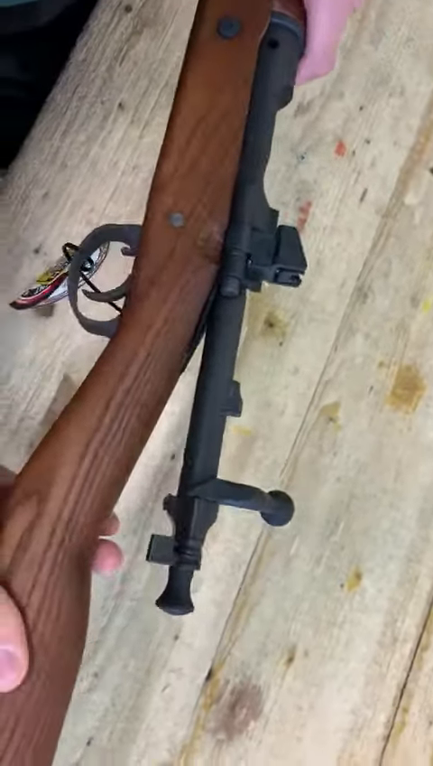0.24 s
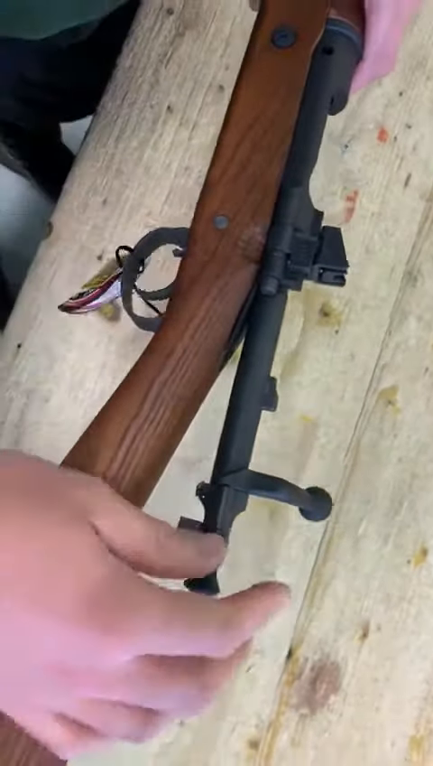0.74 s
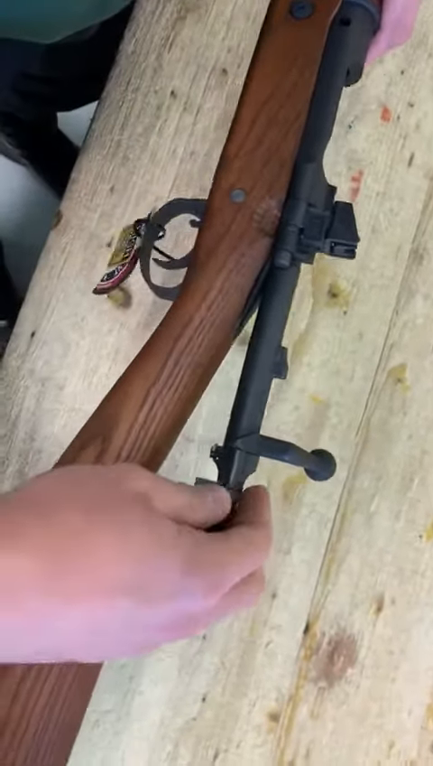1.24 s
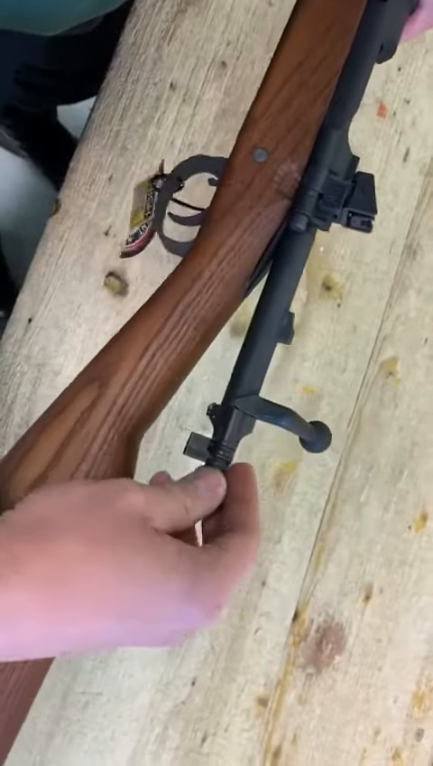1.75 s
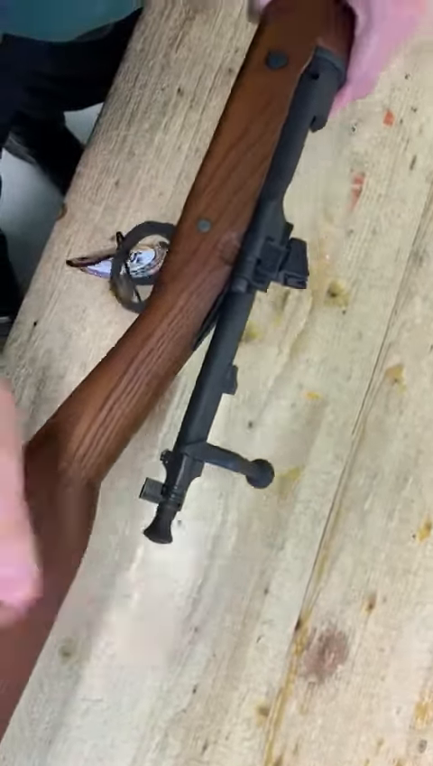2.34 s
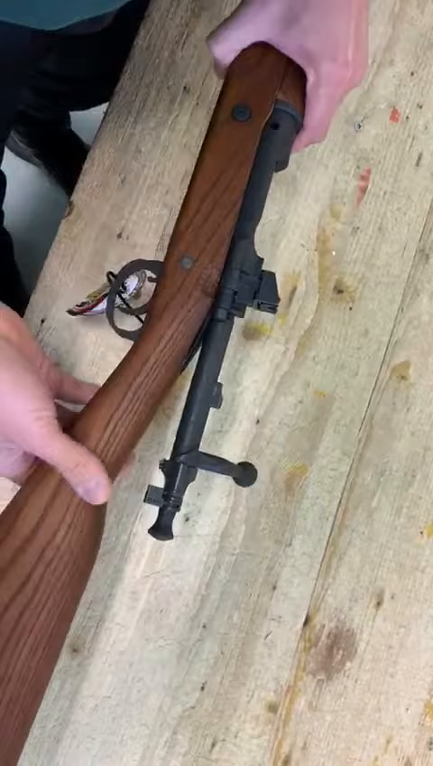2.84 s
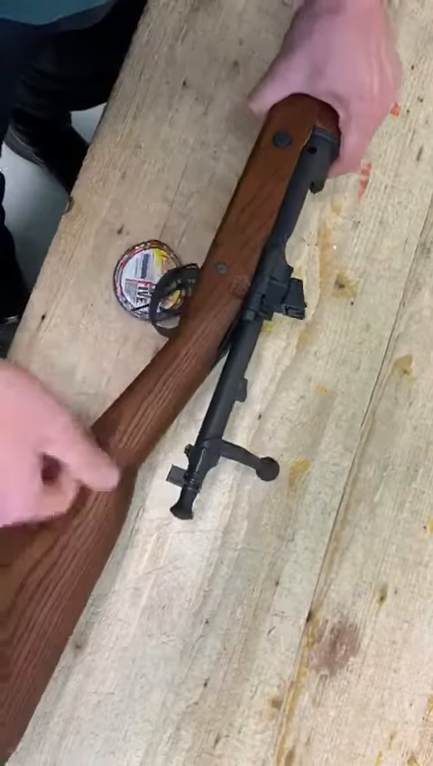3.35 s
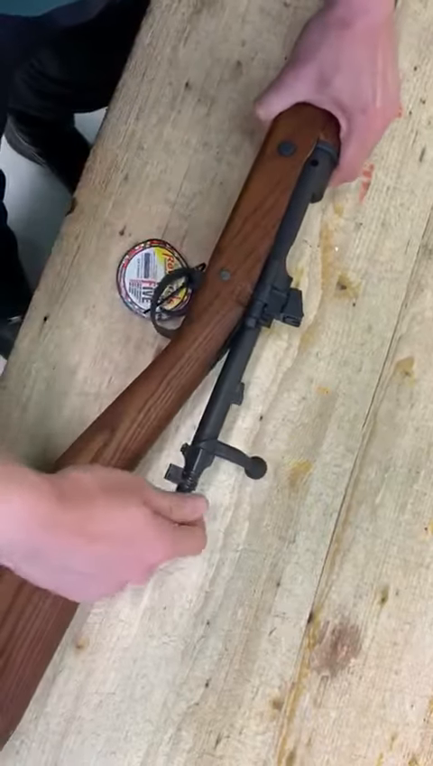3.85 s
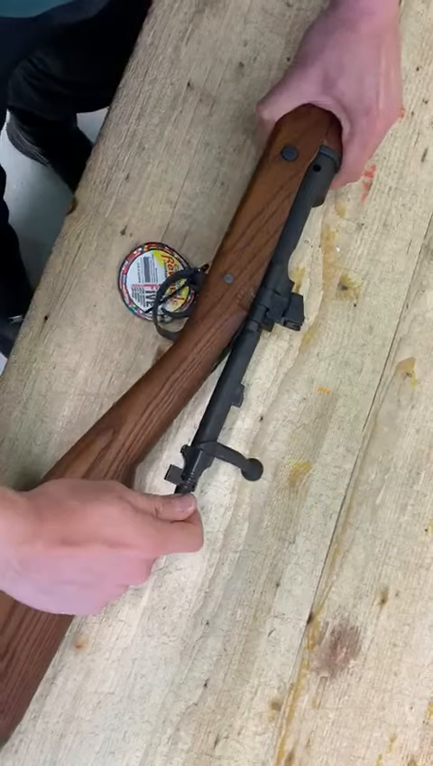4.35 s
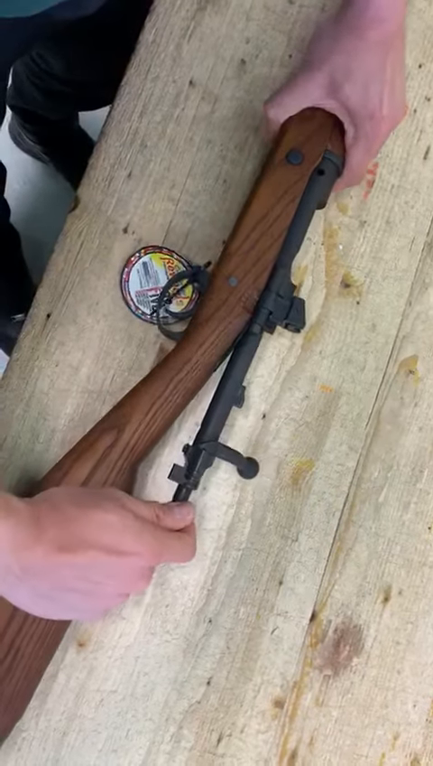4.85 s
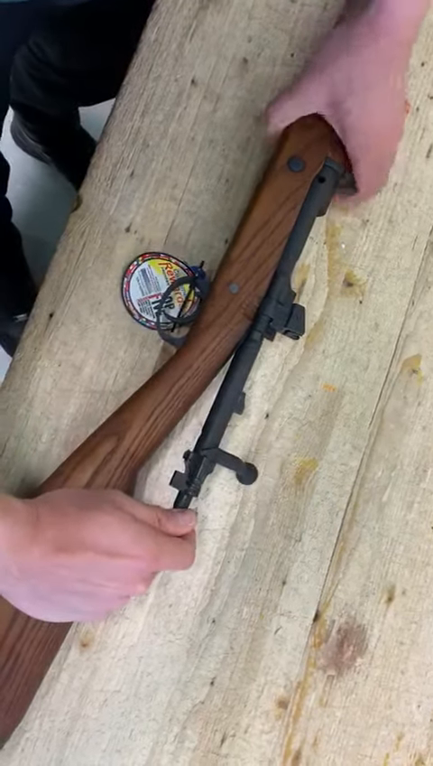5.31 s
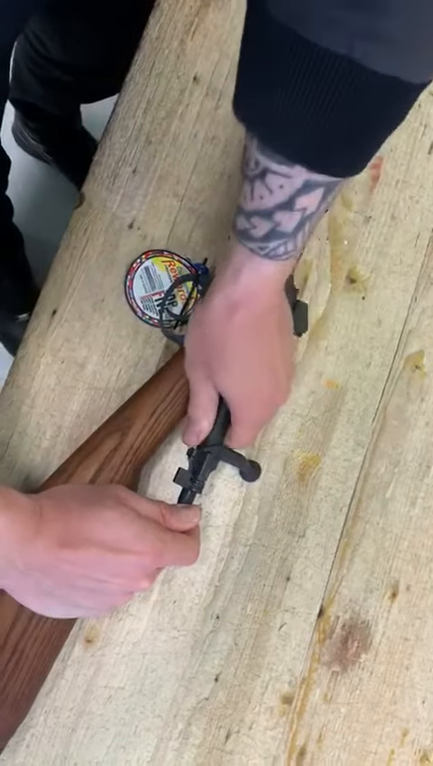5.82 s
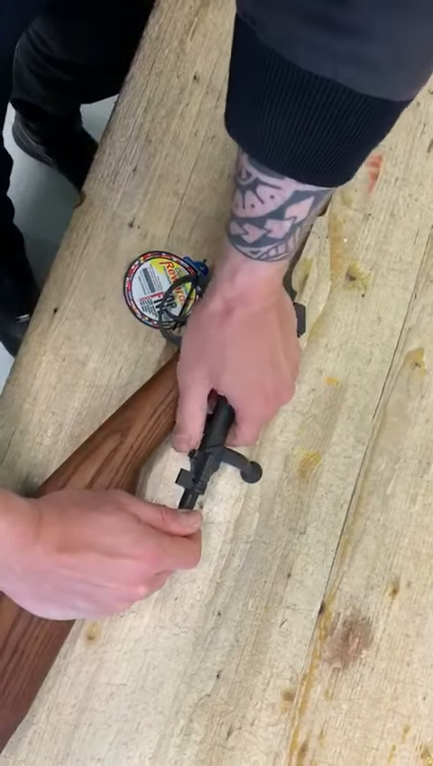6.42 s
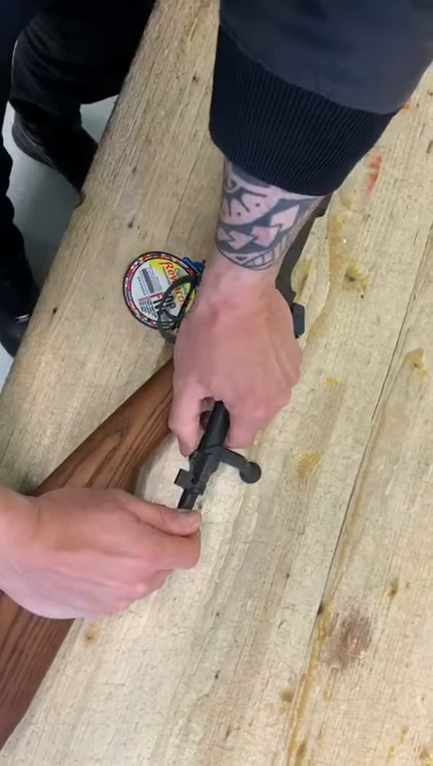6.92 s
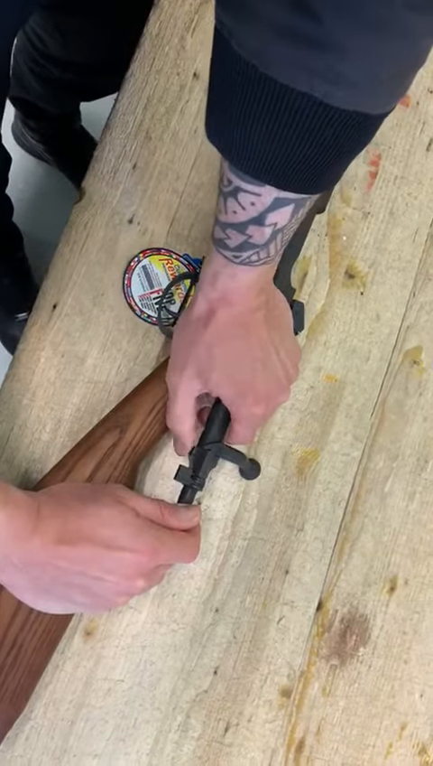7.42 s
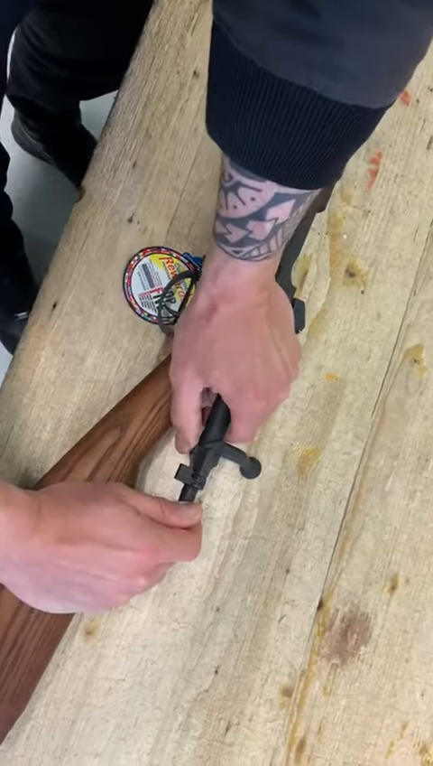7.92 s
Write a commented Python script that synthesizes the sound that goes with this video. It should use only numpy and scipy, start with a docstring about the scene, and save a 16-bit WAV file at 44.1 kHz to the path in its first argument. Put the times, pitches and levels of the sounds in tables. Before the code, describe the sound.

A quiet room with a faint steady low hum and soft bassy room noise, heard close in stereo. From 0 to 3 seconds hands and sleeves rustle softly in short sweeps, with barely audible ticks at 1.3 and 1.9, a thin hiss around 1, and a brighter cloth swish near 2.4. A small tick at 2.9 precedes the loudest event at 3.13: a hard, dry, multi-part metal clack with wooden knock and low bench thump. Bright clicks and rattles follow at 3.4 and 3.5. It calms, with faint taps and tiny creaks from 4 to 4.8. Around 5.04 a medium metallic clack and soft thump sound; cloth brushes at 5.6. At 6.0 a duller knock with light clicks, then near stillness with minute creaky slips around 7.1. Near 8 a little cluster of creaks, a tick and a soft knock ends it.

```python
"""A rifle with a wooden stock is handled over a wooden workbench in a quiet room.
Bursts of tiny impacts ring its metal parts (clacks, ticks) and the wood (knocks); slips make a knob creak.
The bench thumps as short low swings and trembles as low noise; sleeves and hands rustle as shaped noise.
A low machine hum, faint room noise and a short thin hiss lie below, with echoes from feedback delays.
Two microphone ports hear the treble out of step."""
import sys
import numpy as np
from scipy import signal
from scipy.fft import rfft, irfft, next_fast_len
from scipy.io import wavfile

SR = 44100
rng = np.random.default_rng(int(sys.argv[2]) if len(sys.argv) > 2 else 0)


def to_wav(sig):
    """Store sig (one row per channel, or 1-D mono) as 16-bit WAV at the path in sys.argv[1].

    Samples outside -1..1 are clipped; the rate is SR.
    """
    pcm = np.clip(np.atleast_2d(sig), -1, 1) * 32767
    pcm = np.round(pcm).astype(np.int16)
    wavfile.write(sys.argv[1], SR, pcm.T)  # frames by channels


def ratio(d):
    """dB to gain"""
    e = np.asarray(d, float) / 20
    return 10 ** e


N = 360297   # length in samples

# Pushes on the bench top, which swings.
# Each row: start in seconds, level in dB, swing frequency in Hz, fall time in seconds (to 1/e).
BENCH_PUSHES = [(3.146, -16, 61.2, 0.059), (3.231, -26.5, 60.3, 0.055), (3.396, -26.5, 106, 0.02),
                (3.424, -22.5, 64.3, 0.06), (3.494, -24.5, 73.5, 0.022), (3.553, -28.5, 66, 0.034),
                (3.589, -32.5, 50.4, 0.12), (3.894, -40.5, 64.7, 0.039), (4.535, -29.5, 65.7, 0.027),
                (4.674, -24, 61, 0.0074), (4.82, -37, 80.6, 0.037), (4.98, -37, 68, 0.14),
                (5.051, -36, 61, 0.024), (5.067, -19.5, 62.7, 0.047), (5.099, -28, 60, 0.013),
                (5.5, -45, 73.4, 0.17), (6.014, -25.5, 100, 0.013), (6.027, -24, 59.7, 0.037),
                (6.098, -30, 86.8, 0.038), (6.769, -39.5, 70.3, 0.03), (7.137, -35.5, 60.6, 0.027),
                (7.907, -38.5, 62, 0.039)]


def rms_one(x):
    """Scales a sound to an average strength (rms) of 1."""
    return x / np.sqrt(np.mean(x ** 2) + 1e-20)


def peak_one(x):
    """Scales a sound so that its highest peak is 1."""
    return x / (np.abs(x).max() + 1e-20)


def add(out, start_s, x):
    """Mixes a short sound into a long one at a given time."""
    i = round(start_s * SR)
    out[i:i + len(x)] += x[:N - i]


def band_pass(x, low_hz, high_hz):
    """Keeps the range between two frequencies and steeply weakens the rest."""
    return signal.sosfilt(signal.butter(3, [low_hz, high_hz], "band", fs=SR, output="sos"), x)


def at_hz(points, hz):
    """Reads a curve between its points, along a logarithmic frequency axis."""
    points_hz, values = np.transpose(points)
    return np.interp(np.log(hz), np.log(points_hz), values)


def drift(rate_hz):
    """Slow random wandering with rms 1: noise smoothed twice, computed at every 40th sample."""
    r = np.exp(-2 * np.pi * rate_hz * 40 / SR)
    noise = rng.standard_normal(N // 40 + 2002)
    slow = signal.lfilter([1], [1, -2 * r, r * r], noise)[2000:]   # skip the settling
    return np.interp(np.arange(N) / 40, np.arange(len(slow)), rms_one(slow))


def resonate(x, hz, width_hz):
    """Rings at one frequency, as a two-pole resonance with gain 1 on top; narrower rings longer."""
    r = np.exp(-np.pi * width_hz / SR)
    top = (1 - r * r) / 2
    return signal.lfilter([top, 0, -top], [1, -2 * r * np.cos(2 * np.pi * hz / SR), r * r], x)


def chatter(t, rise_s, t60, tail_db, share):
    """Tiny uneven impacts that build up to a blow, die fast and leave a weak rattling tail."""
    grains = rng.standard_normal(len(t)) * ratio(2.99 * np.minimum(rng.exponential(1, len(t)), 5))
    grains *= np.where(rng.random(len(t)) < share, 1, .15)   # only this share of contacts stands out
    grains[round(rise_s * SR)] = ratio(17.5)   # the main blow
    after = np.maximum(t - rise_s, 0)
    build_up = np.minimum(t / rise_s, 1) ** 1.3
    return grains * build_up * (ratio(-60 * after / t60) + ratio(tail_db - 60 * after / 0.21))


def strike(force, modes, best_hz, falloff_db, focus_db):
    """Rings every mode; the point of contact favours one mode and its neighbours, chance adds the rest."""
    hz, db, ring_s = np.transpose(modes)
    away = np.abs(np.log2(hz / best_hz))   # distance in octaves
    db = db - falloff_db * away + focus_db * (away == away.min()) + rng.normal(0, 1.4, len(hz))
    # a long ring needs a narrow resonance
    return np.array([ratio(g) * rms_one(resonate(force, f, 2.4 / ring)) for f, g, ring in zip(hz, db, ring_s)])


def clacks():
    """Metal on metal: the receiver clacks, the small steel parts tick on top."""
    # Metal contacts. Each row: start in seconds, clack peak in dB, steel tick peak in dB,
    # best struck mode in Hz, time in seconds for the impacts to fall by 60 dB.
    contacts = [(0.191, -48.5, -53, 1750, 0.053), (1.347, -53, -68, 1350, 0.18),
                (1.8624, -38, -38.5, 1960, 0.048), (1.865, -37.5, -68, 1300, 0.028),
                (2.923, -35.5, -56, 1310, 0.023), (3.08, -46, -64.5, 1820, 0.034),
                (3.121, -38.5, -34.5, 2103, 0.039), (3.129, -13, -32, 850, 0.014),
                (3.1299, -9.5, -6, 2165, 0.023), (3.1336, -12, -13, 1790, 0.012),
                (3.1356, -11, -20, 2165, 0.015), (3.136, -19.5, -29, 1070, 0.0098),
                (3.151, -32.5, -38.5, 1290, 0.044), (3.165, -31, -16, 1500, 0.042),
                (3.158, -35, -48.5, 1790, 0.018), (3.179, -19, -20, 2165, 0.017),
                (3.207, -38, -37.5, 1950, 0.079), (3.235, -35, -53, 2000, 0.041),
                (3.284, -38.5, -55, 1166, 0.3), (3.342, -37.5, -56.5, 1900, 0.049),
                (3.355, -32, -45, 1560, 0.024), (3.389, -37, -43, 900, 0.016),
                (3.392, -25.5, -8, 4180, 0.023), (3.394, -25, -28.5, 1225, 0.026),
                (3.44, -23, -21, 1790, 0.028), (3.487, -40, -40.5, 2230, 0.028),
                (3.524, -39, -10.5, 4240, 0.023), (3.527, -29, -28.5, 1500, 0.025),
                (3.531, -28.5, -46.5, 1070, 0.019), (3.543, -39.5, -30.5, 1250, 0.01),
                (3.879, -57, -63, 1270, .09), (4.091, -58, -54, 1145, 0.067),
                (4.291, -44.5, -72, 1146, 0.29), (4.717, -52, -54, 1790, 0.06),
                (4.747, -48, -64, 1550, .03), (4.797, -39, -39.5, 2165, 0.032),
                (4.8, -40, -60, 1225, 0.037), (4.952, -32, -30, 2650, 0.012),
                (5.001, -30, -40, 1960, 0.095), (5.004, -34, -60, 4200, 0.033),
                (5.021, -33.5, -31, 2050, 0.098), (5.04, -22.5, -26, 1700, 0.0068),
                (5.043, -17.5, -18.5, 1960, 0.052), (5.046, -25.5, -41, 4170, 0.028),
                (5.056, -28, -26.5, 1400, 0.03), (5.122, -40.5, -66, 1750, 0.1),
                (5.293, -48, -49.5, 1270, 0.033), (6.007, -37.5, -55.5, 1550, 0.087),
                (6.024, -28.5, -34, 1790, 0.022), (6.026, -37, -54, 4170, .025),
                (6.051, -44, -60, 3850, 0.037), (6.035, -34.5, -28.5, 1225, 0.03),
                (6.047, -40, -28, 1750, 0.038), (6.09, -49, -39, 1960, 0.057),
                (6.097, -42, -63, 1400, 0.027), (6.098, -49, -60, 3850, .03), (6.297, -59, -78, 1960, .015),
                (6.484, -56, -71, 1790, .015), (6.744, -53, -76, 1550, .015), (6.896, -63, -72, 2820, .02),
                (7.352, -74, -54, 1436, 0.0098), (7.399, -60.5, -76.5, 3300, 0.027),
                (7.489, -64.5, -78.5, 1790, 0.026), (7.991, -41.5, -30, 4400, 0.03),
                (8.136, -55, -48, 1340, 0.017)]
    # Ways in which receiver and bolt ring.
    # Each row: frequency in Hz, relative level in dB, approximate ring time in seconds (60 dB fall).
    rifle_modes = [(883, -9.5, 0.064), (1070, -5.5, .07), (1250, -3, 0.046), (1400, -1.5, 0.052),
                   (1550, 2.5, 0.018), (1790, 0.5, 0.03), (1960, -0.5, 0.03), (2165, 0.5, 0.028),
                   (2420, -9.5, 0.021), (2820, 0, 0.024), (3120, -12.5, 0.059), (3460, -0.5, 0.023),
                   (3850, -2, 0.032), (4170, -2, 0.032), (4400, -6, 0.032), (4930, -9.5, 0.00068),
                   (6080, 8, 0.026), (6054, -12.5, 0.01), (6250, -1.5, 0.0089), (6770, 2.5, 0.0087),
                   (7420, -3, 0.0055), (7950, 0.5, .008), (8494, 2, 0.0062), (9100, -4, 0.0028),
                   (9500, 3.5, 0.004), (10440, 7.5, 0.0072), (11100, -11.5, .004)]
    steel_above_hz, rise_s = 4600, .0025
    out, t = np.zeros(N), np.arange(SR // 5) / SR
    steel = np.array(rifle_modes)[:, 0] > steel_above_hz
    for start_s, peak_db, steel_db, best_hz, t60 in contacts:
        force = chatter(t, rise_s, t60, tail_db=-32.0, share=.3)
        rings = strike(force, rifle_modes, best_hz, falloff_db=16.0, focus_db=8.0)
        clack = band_pass(rings[~steel].sum(axis=0), 990, 10000)
        tick = band_pass(rings[steel].sum(axis=0), 5300, 14000)
        add(out, start_s, ratio(peak_db) * peak_one(clack))
        add(out, start_s, ratio(steel_db) * peak_one(tick))
    return out


def knocks():
    """Soft blows into the wood; blows on deeper modes build up more slowly."""
    # Knocks on stock and bench. Each row: start in seconds, peak in dB, best struck mode in Hz,
    # time in seconds for the impacts to fall by 60 dB.
    blows = [(1.347, -50, 545, 0.03), (1.352, -48.5, 320, 0.11), (1.864, -42, 322, 0.058),
             (2.921, -40.5, 470, 0.051), (3.13, -29.5, 190, 0.082), (3.1325, -21, 447, 0.025),
             (3.161, -44, 237.8, 0.07), (3.177, -34, 243, 0.046), (3.284, -35.5, 481.5, 0.3),
             (3.337, -38.5, 330, 0.11), (3.391, -25, 545, 0.012), (3.393, -24, 425, 0.047),
             (3.402, -23.5, 359, .035), (3.419, -41, 252, 0.21), (3.427, -26.5, 265, 0.044),
             (3.528, -32, 545, 0.12), (3.541, -35.5, 215, 0.14), (3.876, -45, 253, 0.22),
             (4.093, -57, 225, 0.021), (4.291, -39, 570, 0.045), (4.542, -41, 165, 0.14),
             (4.685, -49.5, 160, 0.041), (4.798, -40, 226, 0.2), (5.005, -33, 330, 0.09),
             (5.024, -35.5, 318, 0.024), (5.042, -32, 235, 0.071), (5.056, -29, 191, 0.066),
             (5.125, -32.5, 425, 0.064), (5.138, -37.5, 291.3, 0.11), (6.007, -26.5, 245, 0.16),
             (6.024, -27.5, 215, 0.059), (6.033, -38, 191, 0.048), (6.097, -29, 362, 0.021),
             (6.11, -35.5, 211, 0.061), (6.49, -51.5, 425, 0.11), (6.742, -48.5, 200, 0.038),
             (6.781, -53.5, 200, 0.058), (7.49, -60.5, 545, .1), (8.139, -34.5, 495, 0.021)]
    # Ways in which stock and bench ring.
    # Each row: frequency in Hz, relative level in dB, approximate ring time in seconds (60 dB fall).
    wood_modes = [(165, 0.5, 0.021), (200, 6, 0.085), (265, 1, 0.12), (320, 0.5, 0.083), (358, -2, 0.073),
                  (425, -7.5, 0.059), (545, -9.5, 0.12), (721, -8, 0.025), (833, -1, 0.015)]
    rise_cycles = 1
    out, t = np.zeros(N), np.arange(SR // 4) / SR
    for start_s, peak_db, best_hz, t60 in blows:
        force = chatter(t, rise_cycles / best_hz, t60, tail_db=-19.0, share=.08)
        rings = strike(force, wood_modes, best_hz, falloff_db=9.5, focus_db=8.0)
        knock = band_pass(rings.sum(axis=0), 82, 1.66 * best_hz)   # a soft contact reaches no higher
        add(out, start_s, ratio(peak_db) * peak_one(knock))
    return out


def creaks():
    """Dense uneven slips ring the knob while it slides under the fingers, then die away."""
    # Slides. Each row: start in seconds, peak in dB, best rubbed mode in Hz, sliding time in seconds.
    slides = [(4.51, -49, 3350, 0.051), (4.534, -47, 1485, 0.028), (4.612, -41.5, 1485, 0.044),
              (4.613, -50, 3350, 0.048), (4.805, -48, 2020, 0.028), (5.218, -48, 1485, 0.0022),
              (5.23, -46, 1485, 0.017), (5.54, -38.5, 1485, 0.0094), (5.829, -41, 1290, 0.0057),
              (5.871, -45.5, 1485, 0.0033), (5.985, -44.5, 1592, .02), (6.225, -55, 1426, 0.0049),
              (6.859, -57.5, 1383, 0.006), (7.007, -68, 1295, 0.0084), (7.028, -42.5, 1485, 0.0097),
              (7.03, -46.5, 2800, 0.0057), (7.055, -58, 1610, .004), (7.154, -44, 1485, 0.0069),
              (7.156, -52.5, 2800, .012), (7.218, -44, 1485, 0.014), (7.839, -65.5, 1290, 0.018),
              (7.884, -64, 1290, 0.0095), (7.9, -44, 3350, 0.014), (7.945, -40, 2400, 0.007),
              (7.95, -44, 1490, 0.037), (7.994, -37, 1870, 0.0091), (8, -44.5, 1290, 0.04),
              (8.006, -55, 3350, .03), (8.021, -47, 2310, 0.049), (8.048, -54, 3350, 0.013),
              (8.066, -50, 2800, 0.017), (8.081, -42, 1290, 0.02), (8.107, -48.5, 1790, 0.022),
              (8.135, -44, 2800, .002), (8.135, -30.5, 1810, 0.0015), (8.141, -36, 1280, 0.002)]
    # Ways in which the knob rings.
    # Each row: frequency in Hz, relative level in dB, approximate ring time in seconds (60 dB fall).
    knob_modes = [(839, -3, 0.08), (1290, 3.5, 0.052), (1485, 2.5, 0.047), (1810, -4, 0.036),
                  (2020, -6, 0.085), (2310, -9.5, 0.025), (2544, -1.5, 0.05), (2800, -1, 0.03),
                  (3350, -1.5, 0.077), (4220, -16, 0.027), (4470, -7, 0.034)]
    rise_s, t60, slips_per_s = 0.0022, 0.024, 4500
    out, t = np.zeros(N), np.arange(SR // 3) / SR
    for start_s, peak_db, best_hz, slide_s in slides:
        sizes = ratio(4.0 * np.minimum(rng.exponential(1, len(t)), 4)) * rng.choice([-1, 1], len(t))
        slips = sizes * (rng.random(len(t)) < slips_per_s / SR)
        slips *= np.minimum(t / rise_s, 1) * ratio(-60 * np.maximum(t - slide_s, 0) / t60)
        rings = strike(slips + 1e-12, knob_modes, best_hz, falloff_db=3.5, focus_db=8.5)
        add(out, start_s, ratio(peak_db) * peak_one(band_pass(rings.sum(axis=0), 910, 3530)))
    return out


def thumps():
    """The bench makes a few low swings that build up and are damped by hands and rifle."""
    rise_cycles = 0.72
    out, t = np.zeros(N), np.arange(SR // 2) / SR
    for start_s, level_db, hz, fall_s in BENCH_PUSHES:
        rise_s = rise_cycles / hz
        swell = np.sin(np.pi / 2 * np.minimum(t / rise_s, 1)) ** 2
        swell *= np.exp(-(np.maximum(t - rise_s, 0) / fall_s) ** 2)
        add(out, start_s, -ratio(level_db) * swell * np.sin(2 * np.pi * hz * t))
    return out


def tremble():
    """Low noise in the bench top: dying away after each push, faint once the rifle rests on it."""
    below_push_db, t60 = -15, 0.44
    lean_from_s, lean_db = 3.04, -60.5
    t = np.arange(N) / SR
    level = ratio(lean_db) * np.clip((t - lean_from_s) / .1, 0, 1)
    short = t[:SR]
    for start_s, push_db, _, _ in BENCH_PUSHES:
        fall = ratio(push_db + below_push_db - 60 * short / t60)
        add(level, start_s, fall * np.minimum(short / 0.012, 1))
    return level * rms_one(band_pass(rng.standard_normal(N), 55, 110))


def banded_noise(spectrum, low_hz, patchy_db):
    """Half-octave bands of stereo noise, each with its own level, flicker and left-right likeness; rms 1."""
    # How alike left and right are. Each row: frequency in Hz, likeness (0 unrelated, 1 the same).
    likeness = [(100, 1.0), (300, 0.78), (800, 0.012), (2000, 0.31), (3400, 0.081), (5400, 0.99),
                (8000, 0.97), (11000, 1)]
    out, edges = 0, 13000 / 2 ** np.arange(0, 9.6, .5)
    white = rng.standard_normal((2, 2, N))   # neighbouring bands take turns with two noise pairs
    for k, (high, low) in enumerate(zip(edges, edges[1:])):
        if low > low_hz:
            band = signal.butter(4, [low, high], "band", fs=SR, output="sos")
            mid, side = signal.sosfilt(band, white[k % 2])
            hz = np.sqrt(low * high)
            alike = np.clip(at_hz(likeness, hz), 0, 1)
            gain = ratio(at_hz(spectrum, hz) + patchy_db * (drift(3.9) + 0.49 * drift(36.0)))
            out = out + gain * (np.sqrt(1 + alike) * mid + np.sqrt(1 - alike) * side * [[1], [-1]])
    return rms_one(out)


def rustle():
    """Cloth hisses bright, skin on wood rubs duller; sweeps swell and fade over a restless background."""
    # Sleeves and hands sweeping past. Each row: loudest moment in seconds, swell time in seconds,
    # fade time in seconds, bright cloth level in dB, dull skin level in dB.
    sweeps = [(0.09, 0.13, 0.084, -54, -61), (0.45, 0.14, 0.14, -55, -55), (0.68, 0.077, 0.59, -63.5, -69),
              (1.39, 0.071, 0.054, -69, -59.5), (1.54, 0.092, 0.18, -55.5, -61),
              (2.14, 0.062, 0.018, -63.5, -89), (2.24, 0.11, 0.14, -57, -61),
              (2.391, 0.19, 0.11, -47, -54.5), (2.688, 0.11, 1, -52.5, -58),
              (3.148, 0.039, 0.073, -44, -36.5), (3.29, 0.21, 0.21, -57, -51.5),
              (3.41, 0.044, 0.21, -64.5, -48.5), (3.53, 0.21, 0.65, -56, -57),
              (3.879, 0.028, 0.15, -61.5, -67), (4.17, 0.2, 0.018, -68.5, -84.5),
              (4.532, 0.16, 0.076, -62.5, -57), (4.64, 0.059, 0.037, -66.5, -53.5),
              (4.839, 0.12, 0.076, -62, -57), (5.059, 0.14, 0.077, -57, -43.5),
              (5.25, 0.053, 0.16, -60.5, -67), (5.63, 0.3, 0.27, -45.5, -48.5),
              (6.05, 0.076, 0.086, -53, -51.5), (6.331, 0.049, 0.024, -74, -72),
              (6.539, 0.18, 0.13, -73, -66), (6.71, 0.16, 0.18, -77, -63.5),
              (7.051, 0.052, 0.052, -84, -71), (7.499, 0.045, 0.082, -79, -73.5),
              (8.02, 0.098, 0.21, -66.5, -55)]
    # The hands are never quite still. Each row: time in seconds, cloth level in dB, skin level in dB.
    fidget = [(0, -68, -63), (0.9, -74, -65), (1.201, -77, -67.5), (1.75, -71.5, -73.5),
              (2.052, -82.5, -78), (2.55, -64.5, -64), (3.05, -74, -59.5), (3.801, -89, -74),
              (4.301, -72, -65), (4.9, -75.5, -66), (5.15, -68, -62), (5.951, -85, -59.5),
              (6.2, -78.5, -71.5), (6.45, -83, -66), (6.75, -73.5, -75), (6.9, -86.5, -77),
              (7.2, -80.5, -72), (7.601, -96.5, -78.5), (7.85, -84.5, -75.5), (8.17, -74.5, -56.5)]
    # Tone of cloth. Each row: frequency in Hz, relative level in dB per Hz.
    cloth_spectrum = [(300, -24), (1000, -6.5), (2500, -4.5), (4000, -2.5), (6000, 2.5), (8000, 1),
                      (11000, -4)]
    # Tone of skin on wood. Each row: frequency in Hz, relative level in dB per Hz.
    skin_spectrum = [(150, 3.5), (400, 0), (1000, 0), (2500, -2), (4000, -9.5), (6000, -24), (9000, -38.5)]
    edge_db = 24.5   # loss one swell time before or one fade time after the top
    waver_db, grain_db = 1.5, 1.5   # slow unevenness of the fidgeting, fast unevenness of the rubbing
    t = np.arange(N) / SR
    s, *still_db = np.transpose(fidget)
    power = np.array([ratio(np.interp(t, s, db) + waver_db * drift(0.85)) ** 2 for db in still_db])
    for top_s, swell_s, fade_s, cloth_db, skin_db in sweeps:
        near = slice(max(int((top_s - 2 * swell_s) * SR), 0), int((top_s + 2 * fade_s) * SR))
        away = np.maximum((top_s - t[near]) / swell_s, (t[near] - top_s) / fade_s)
        power[:, near] += ratio(np.array([[cloth_db], [skin_db]]) - edge_db * away ** 1.71) ** 2
    cloth, skin = np.sqrt(power) * ratio(grain_db * drift(28.0))
    cloth_noise = banded_noise(cloth_spectrum, 280, patchy_db=2.5)
    skin_noise = banded_noise(skin_spectrum, 140, patchy_db=2.5)
    return cloth * cloth_noise + skin * skin_noise


def room(x):
    """Echoes from six feedback delays a side, weaker and duller on every round."""
    t60, wall_cut_hz = 0.41, 5600
    size = next_fast_len(N + SR)
    z = np.exp(-2j * np.pi * np.arange(size // 2 + 1) / size)   # a delay of one sample
    dull = np.exp(-2 * np.pi * wall_cut_hz / SR)
    out = np.zeros((2, size // 2 + 1), complex)
    for k, lag_s in enumerate(np.geomspace(.004, .023, 12)):
        loop = ratio(-60 * lag_s / t60) * (1 - dull) / (1 - dull * z) * z ** round(lag_s * SR)
        out[k % 2] += loop / (1 - loop) * (-1) ** (k // 2)
    return irfft(out * rfft(x, size), size)[:, :N]


def side_hiss():
    """A short stretch of thin noise in two bands, unrelated at the two ports."""
    start_s, end_s, edge_s = 0.82, 1.37, 0.12
    bands = [(2350, 3050, -70.5), (4780, 5470, -73.5)]   # low Hz, high Hz, dB
    t = np.arange(N) / SR
    level = np.clip(np.minimum(t - start_s, end_s - t) / edge_s, 0, 1) * ratio(2.0 * drift(5.4))
    white = rng.standard_normal((2, N))
    return level * sum(ratio(db) * rms_one(band_pass(white, low, high)) for low, high, db in bands)


def hum():
    """A machine hum: a steady low tone that wavers through noise in a narrow resonance."""
    hz, width_hz, steady_db, waver_db = 48.65, 6.8, -49, -53
    steady = np.sqrt(2) * np.sin(2 * np.pi * hz * np.arange(N) / SR)
    noise = rng.standard_normal(N + SR)
    waver = resonate(resonate(noise, hz, width_hz), hz, 2 * width_hz)[SR:]   # skip the settling
    return ratio(steady_db) * steady + ratio(waver_db) * rms_one(waver)


def room_noise():
    """Faint noise of the room, strongest in the bass and nearly even in time."""
    # Tone of the room noise. Each row: frequency in Hz, relative level in dB per Hz.
    air_spectrum = [(20, 6.5), (40, 3), (70, 4), (110, -9.5), (200, -11.5), (400, -19.5), (800, -46.5),
                    (2000, -43.5), (4000, -52), (8000, -45.5), (11000, -43)]
    return ratio(-56.5) * banded_noise(air_spectrum, 15, patchy_db=-0.5)


def scene():
    """Rifle, bench and hands close by, hum and room noise all around."""
    rifle = clacks() + knocks() + creaks()
    close = rifle * ratio(np.array([[-.4], [.4]]))   # dB: slightly louder on the right
    echoes = ratio(-27) * room(band_pass(rifle, 200.0, 4800))
    bench = thumps() + tremble()
    return close + echoes + bench + rustle() + side_hiss() + hum() + room_noise()


def roll_off(x):
    """The treble ends steeply here."""
    return signal.sosfilt(signal.butter(12, 12100, fs=SR, output="sos"), x)


def record(dry):
    """The two ports drift apart in phase and a little in level toward the treble; the top is cut."""
    # How far the left port is ahead. Each row: frequency in Hz, phase lead in radians.
    left_lead = [(0, 0), (2000, .3), (2500, 1.0), (3400, 1.4), (4100, 1.0), (4650, 2.3), (4950, 2.95),
                 (5900, 3.4), (6300, 4.7), (7400, 6.1), (9400, 6.7), (10700, 9.3), (13000, 9.5)]
    # How much louder the left port is. Each row: frequency in Hz, left minus right in dB.
    left_gain = [(0, 0), (90, 0), (200, -0.5), (500, -1), (1500, 0), (3400, 0), (4600, -1.5), (5400, 0),
                 (13000, 1.5)]
    size = next_fast_len(N + 4096)
    hz = np.arange(size // 2 + 1) * SR / size
    # each port takes half of the difference, in opposite directions
    half_lead = np.interp(hz, *np.transpose(left_lead)) / 2
    half_gain = np.log(ratio(np.interp(hz, *np.transpose(left_gain)) / 2))
    turn = np.exp((half_gain + 1j * half_lead) * [[1], [-1]])
    ports = irfft(rfft(dry, size) * turn, size)[:, :N]
    top_cut = signal.cheby2(18, 60, 12350, fs=SR, output="sos")   # 60 dB down from 12350 Hz up
    mix = signal.sosfilt(top_cut, ports)
    return roll_off(mix)


dry = scene()
out = record(dry)
to_wav(out)
```